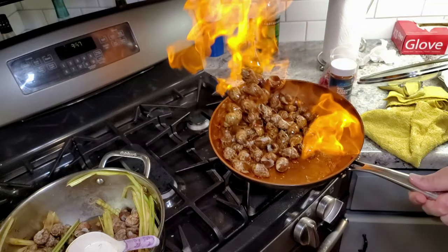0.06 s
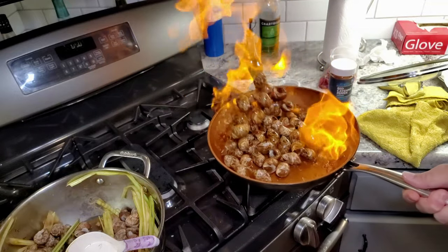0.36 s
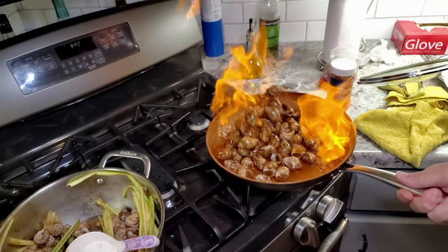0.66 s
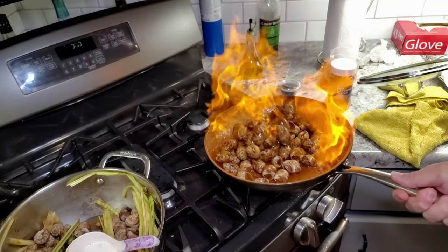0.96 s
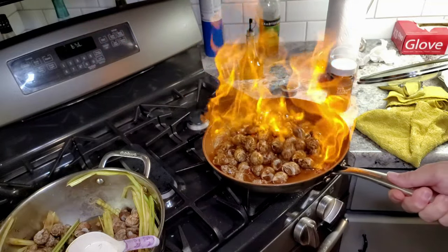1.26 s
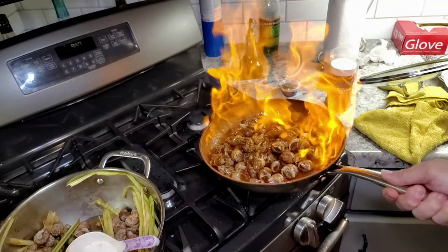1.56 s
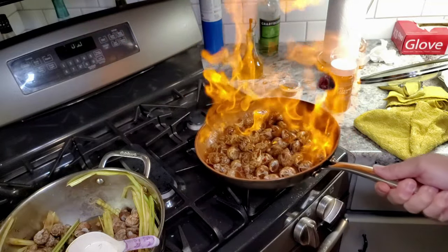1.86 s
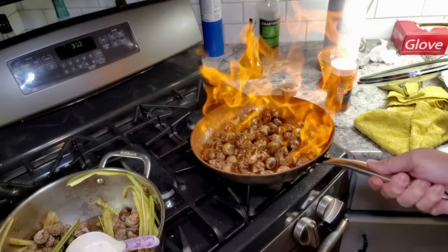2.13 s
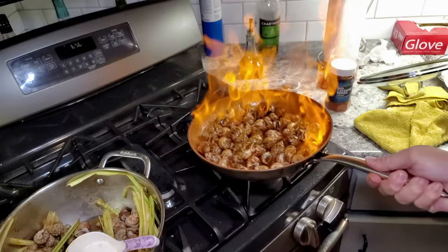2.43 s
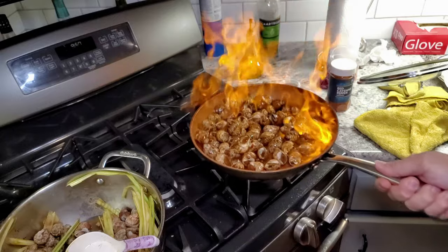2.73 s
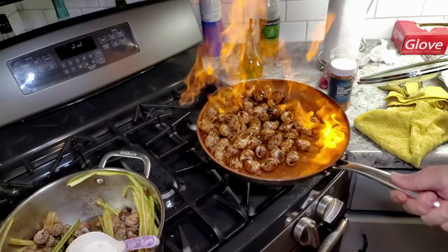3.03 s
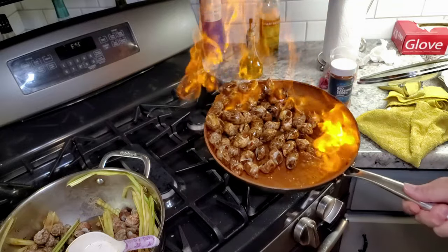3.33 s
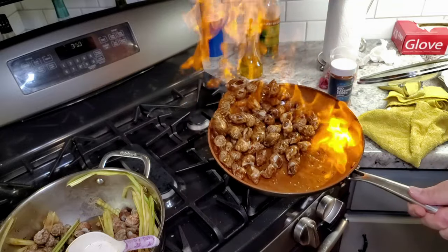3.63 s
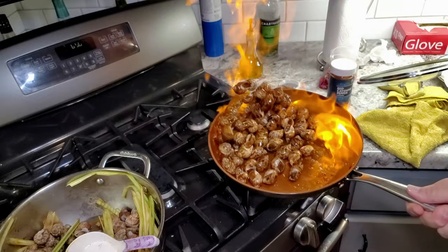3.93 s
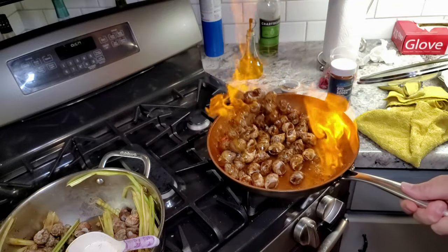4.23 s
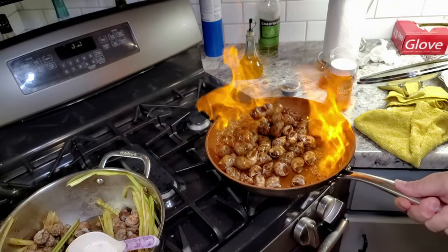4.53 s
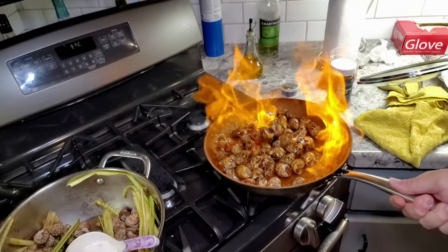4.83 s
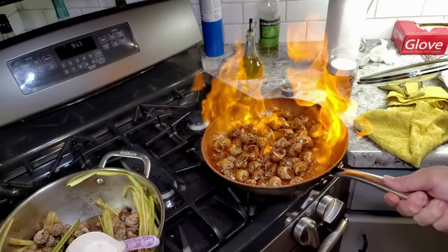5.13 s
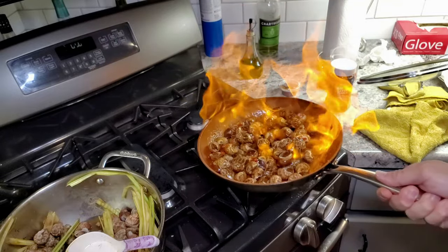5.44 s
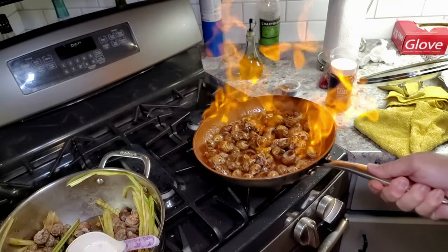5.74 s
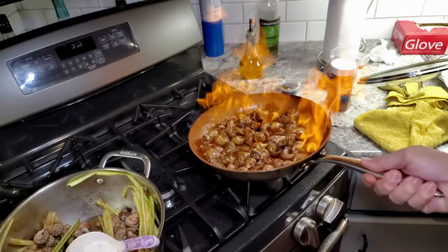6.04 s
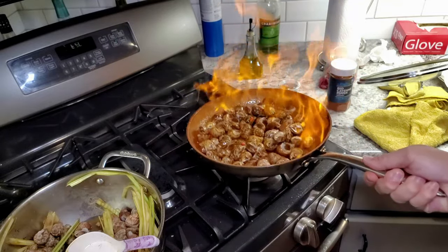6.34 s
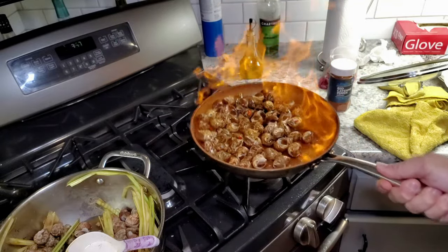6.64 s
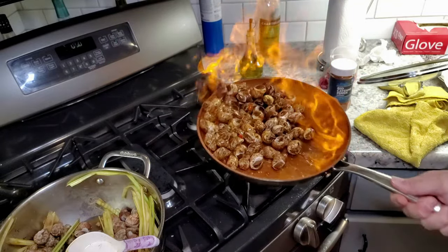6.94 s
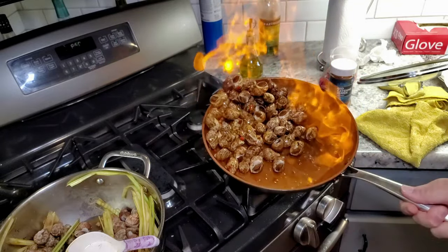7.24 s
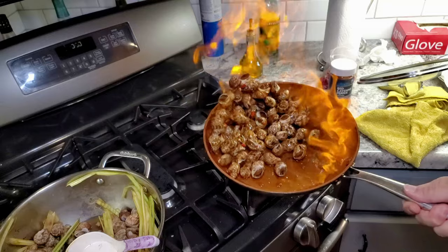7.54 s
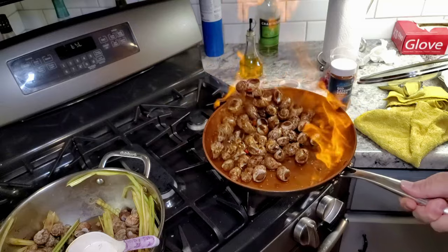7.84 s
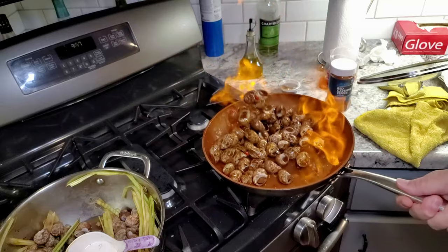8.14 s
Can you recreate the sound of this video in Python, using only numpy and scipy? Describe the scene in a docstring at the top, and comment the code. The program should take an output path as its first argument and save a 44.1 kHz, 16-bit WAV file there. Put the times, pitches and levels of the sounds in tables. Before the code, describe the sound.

Snail shells are tossed in a flaming frying pan, heard close and slowed down, so everything sounds deep and dull. A rolling rattle and a low flame rumble swell and sink together throughout, over a faint, muffled sizzle of boiling liquor. Hollow knocks start at once and thicken from 0.5 to 2.4 seconds, with deep thuds, small shell clinks and harder crashes near 0.9 and 1.7 seconds. A few lighter knocks come around 2.8 seconds, then a lull lasts until about 4.1. The shells tumble down again, loudest from 4.7 to 5.2 seconds, with heavy knocks, thuds and clinks, the hardest hits briefly overloading the microphone. The heap settles into scattered knocks, growing quiet around 7 seconds. From about 7.6 seconds the knocks build again, with several firm landings up to the end just after 8 seconds.

```python
"""Flaming snail shells in slow motion

Snail shells are tossed in a frying pan; slowed down, everything is deep and dull. They land with
hollow knocks and deep thuds and clink against each other over the rolling rattle of the heap.
Flames rumble, boiling liquor sizzles, and the hardest crashes overload the microphone."""
import sys
import numpy as np
from scipy import signal
from scipy.fft import rfft, irfft
from scipy.io import wavfile

SR = 44100
rng = np.random.default_rng(int(sys.argv[2]) if len(sys.argv) > 2 else 0)


def int16_out(signal):
    """Quantize to a 16-bit WAV file."""
    q = np.round(np.clip(np.atleast_2d(signal).T, -1, 1) * 32767)
    wavfile.write(sys.argv[1], SR, q.astype(np.int16))


N = 361179
RING_SAMPLES = 2 ** 15
FREQS_HZ = np.fft.rfftfreq(RING_SAMPLES, 1 / SR)


def gain_of(db):
    """Decibels to amplitude."""
    return 10 ** (np.asarray(db) / 20)


def unit_rms(x):
    """Scales to rms 1."""
    return x / np.sqrt(np.mean(x ** 2) + 1e-20)


def envelope(curve):
    """Gain per sample from (seconds, dB) points."""
    return gain_of(np.interp(np.arange(N) / SR, *np.transpose(curve)))


def add(mix, start_s, sound):
    """Mixes a sound in at start_s."""
    part = mix[max(round(start_s * SR), 0):][:len(sound)]
    part += sound[:len(part)]


def coloured(x, spectrum):
    """Filters by a spectrum of (Hz, dB) points."""
    hz, db = np.transpose(spectrum)
    curve_db = np.interp(np.log(FREQS_HZ + 1), np.log(hz + 1), db)
    taps = np.fft.fftshift(irfft(gain_of(curve_db)))
    return signal.fftconvolve(x, taps)[len(taps) // 2:][:len(x)]


def mode_responses(modes):
    """One frequency response per mode; a soft contact rounds off its upper skirt."""
    rows = []
    for hz, width_hz, db in modes:
        damping = 1j * FREQS_HZ * width_hz
        resonance = damping / (hz ** 2 - FREQS_HZ ** 2 + damping)
        rows.append(gain_of(db) * resonance / (1 + 1j * FREQS_HZ / hz) ** 2)
    return np.array(rows)


def contact_band(hz, octaves, floor_db):
    """The band a contact excites: a bell on the octave scale."""
    return np.exp(-.5 * (np.log2((FREQS_HZ + 1) / hz) / octaves) ** 2) + gain_of(floor_db)


def random_spot(body):
    """Each spot on a body drives its modes with different weights."""
    weights = rng.choice([-1, 1], len(body)) * rng.uniform(.5, 1.5, len(body))
    return weights @ body


def ringing(drive, body, band):
    """A driven body rings, mainly in the contact band, and fades to silence."""
    fade = (1 - np.linspace(0, 1, len(drive)) ** 2) ** 2
    return irfft(rfft(drive) * random_spot(body) * band) * fade


def ticks(per_s, spread_db, samples):
    """Random impulses, mostly small, a few large."""
    sizes = gain_of(spread_db * np.minimum(rng.exponential(1, samples), 4))
    return sizes * rng.choice([-1, 1], samples) * (rng.random(samples) < per_s / SR)


def blow(t, hz, rise_cycles):
    """The push of a contact swells and dies within a few cycles."""
    age = t * hz / rise_cycles
    return age * np.exp(1 - age) * np.sin(2 * np.pi * hz * t + rng.uniform(0, 2 * np.pi))


# Modes of the loaded pan. Each row: frequency in Hz, width in Hz, level in dB.
PAN_MODES = [(91.5, 23, -9), (106, 6.5, -7.5), (153.7, 29, 0.5), (169, 40, -5), (225.2, 22, 5),
             (245.4, 29, 1), (282, 21, 1), (351.7, 11, -0.5), (418.3, 18, 0.5), (487.1, 20, 0.5),
             (539, 33, -2), (601, 14, 0), (621.1, 21, 0.5), (678.8, 13, -2), (736, 39, -9),
             (810.7, 40, -7.5), (823, 44, -4.5), (872.4, 13, -4.5), (968.6, 8.4, -6.5), (979, 39, -17),
             (1134, 38, -14), (1171, 88, -20.5), (1480, 120, -22), (1830, 820, -29)]
# Heap motion: quiet in flight, loudest coming down, then rolling to rest.
# Each row: time in seconds, level in dB.
HEAP_MOTION = [(0.0, -22), (0.46, -30), (0.86, -18.5), (1.8, -22), (2.62, -29), (2.94, -27), (3.44, -37.5),
               (4.04, -30), (4.33, -26.5), (4.97, -13.5), (5.36, -18), (5.66, -28), (6.61, -27),
               (7.46, -37.5), (7.82, -29), (8.19, -25)]


def rattle(spots=6):
    """The rolling heap makes many small bumps on different spots of the pan."""
    pan = mode_responses(PAN_MODES)
    bumps = np.zeros(N)
    for _ in range(spots):
        impacts = ticks(per_s=60, spread_db=1.84, samples=N)
        bumps += signal.oaconvolve(impacts, irfft(random_spot(pan)))[:N]
    return envelope(HEAP_MOTION) * unit_rms(bumps)


# Spectrum of the flames and thuds. Each row: frequency in Hz, level in dB.
RUMBLE_SPECTRUM = [(5, -18.5), (12, -9), (22, -15), (55, -15.5), (66, -18), (80, 4.5), (110, 1),
                   (128, -12.5), (145, -4), (180, -10.5), (235, -4.5), (330, -13), (1200, -45)]
# Deep thuds as the heap lands. Each row: start in seconds, relative peak in dB.
LANDING_THUDS = [(0.542, -27), (0.773, -14), (1.148, -15), (1.222, -12), (3.117, -25.5), (4.209, -17.5),
                 (4.47, -14.5), (4.889, -14), (5.064, -9.5), (6.271, -26.5), (7.128, -20.5), (7.66, -24)]


def flames_and_thuds(flame_db=-16, fanning_power=0.71, thud_db=-5, swell_s=0.02):
    """Turbulent flames rumble, fanned by the heap; its landings thud, swelling quickly and dying."""
    puffs = ticks(per_s=900, spread_db=2.5, samples=N)
    level = gain_of(flame_db) * envelope(HEAP_MOTION) ** fanning_power
    age = np.arange(SR) / SR / swell_s
    for start_s, db in LANDING_THUDS:
        add(level, start_s, gain_of(db + thud_db) * age * np.exp(1 - age))
    return level * unit_rms(coloured(puffs, RUMBLE_SPECTRUM))


# Strength of the boil. Each row: time in seconds, relative level in dB.
SIZZLE_LEVELS = [(0.0, -40), (1.66, -41), (2.03, -42.5), (4.45, -40), (4.79, -47), (5.98, -45), (8.19, -44)]
# Bubble spectrum. Each row: frequency in Hz, level in dB.
SIZZLE_SPECTRUM = [(200, -14), (900, -3.5), (1040, -9.5), (1160, -1.5), (1280, -2.5), (1480, 3),
                   (1950, 3.5), (2060, -0.5), (2200, 2.5), (2320, -5), (2460, -3), (2700, -13)]


def sizzle(level_db=1):
    """Liquor boils on hot metal; countless small bubbles merge into an even hiss."""
    pops = ticks(per_s=5000, spread_db=1.0, samples=N)
    return gain_of(level_db) * envelope(SIZZLE_LEVELS) * unit_rms(coloured(pops, SIZZLE_SPECTRUM))


# Shells landing. Each row: start in seconds, relative blow level in dB, pitch in Hz, clatter in dB.
LANDINGS = [(0.0462, -7, 336, -25), (0.0859, 1, 260, -18.5), (0.2042, -13, 320, -22.5),
            (0.488, -3.5, 425, -15.5), (0.546, -13, 297, -22), (0.6315, -5, 305, -42.5),
            (0.7156, -6.5, 294, -29), (0.7695, 3, 380, -20), (0.816, -7, 332, -14.5),
            (0.8759, -2, 486, -12), (0.887, 3.5, 304, -9), (0.930, -6, 478, -15), (1.0254, 0.5, 294, -23.5),
            (1.156, -5.5, 200, -19), (1.2554, -3.5, 420, -23.5), (1.459, -2.5, 260, -17),
            (1.4796, -6, 309, -16), (1.5383, 0, 317, -24.5), (1.675, 2.5, 480, -6.5),
            (1.8273, -13, 443, -17.5), (1.919, -4, 277, -28), (1.969, -2, 360, -16.5),
            (2.1856, -6.5, 302, -22), (2.2398, -1, 320, -27), (2.2832, -8.5, 340, -25),
            (2.3557, -5.5, 430, -26.5), (2.789, -7.5, 608, -24), (2.821, -7, 580, -17),
            (2.855, -15.5, 634, -24), (2.8882, -4.5, 590, -22.5), (3.0881, -22, 328, -25.5),
            (3.426, -10, 533, -31), (4.1696, 1, 265, -21.5), (4.235, -1.5, 507, -13), (4.2641, 3, 438, -22),
            (4.3947, -13.5, 300, -19.5), (4.4801, -3, 195, -26), (4.549, -3, 400, -18.5),
            (4.6132, 0, 505, -27.5), (4.7039, 10, 499, -13), (4.7872, -3.5, 411, -17),
            (4.809, -4.5, 305, -20.5), (4.901, 8.5, 457, -8), (5.088, 5.5, 287, -8.5),
            (5.1182, 2.5, 268, -21), (5.257, -11.5, 310, -23), (5.3896, -13, 317, -19.5),
            (5.4986, -11, 462, -19.5), (5.879, 0.5, 354, -19.5), (6.0662, -3, 370, -32.5),
            (6.1942, -6, 548, -25.5), (6.278, 0.5, 415, -19), (6.4569, -9.5, 311, -25.5),
            (6.6163, -4, 416, -33), (6.7539, -11.5, 385, -26.5), (6.883, -24, 386, -23.5),
            (7.1391, -19, 208, -25), (7.4639, -11, 260, -34), (7.5851, -10, 370, -28.5),
            (7.6032, -5.5, 490, -19.5), (7.6719, -21, 407, -18.5), (7.801, -8, 390, -25),
            (7.8441, 4, 354, -14), (7.9662, 4, 330, -19.5), (8.0903, -2.5, 430, -18.5),
            (8.165, 2.5, 235, -18)]


def knocks(blow_db=-5, rise_cycles=0.51, rebound_s=0.008, rebound_db=-6,
           settle_s=0.053, linger_db=-13, linger_s=0.11,
           crash_db=-7.5, crash_gap_s=0.008, crash_step_db=-1.5):
    """A shell thumps the pan and rebounds; the pan rings on as its neighbours chatter and settle."""
    out, t = np.zeros(N), np.arange(RING_SAMPLES) / SR
    pan = mode_responses(PAN_MODES)
    settling = np.exp(-t / settle_s) + gain_of(linger_db) * np.exp(-t / linger_s)
    early = (t > .011) & (t < .04)
    lowpass = signal.butter(3, 1100, fs=SR, output="sos")
    for start_s, db, hz, clatter_db in LANDINGS:
        chatter = ticks(per_s=600, spread_db=1.5, samples=len(t)) * settling
        chatter[0] = 4  # the blow itself starts the modes
        clatter = ringing(chatter, pan, contact_band(hz * 1.33, octaves=0.83, floor_db=-4.5))
        clatter *= gain_of(clatter_db) / (clatter[early].std() + 1e-12)
        push = blow(t, hz, rise_cycles)
        delay_s = rebound_s * rng.uniform(.7, 1.5)
        add(push, delay_s, gain_of(rebound_db) * blow(t, hz * rng.uniform(.8, 1.4), rise_cycles))
        # Three more shells follow, faint unless the clatter nears crash_db.
        crash = gain_of(2 * min(clatter_db - crash_db, 0))
        for k in range(3):
            delay_s = crash_gap_s * (k + rng.uniform(0.56, 1))
            add(push, delay_s, crash * gain_of(k * crash_step_db) * blow(t, hz, rise_cycles))
        thump = gain_of(db + blow_db) * signal.sosfilt(lowpass, push)
        add(out, start_s - .001, thump + clatter)
    return out


def stray_shells(per_s=7, over_heap_db=5.5, spread_db=2, middle_hz=310, octaves=0.34):
    """Single shells tumble off at random, as hard as the heap is moving."""
    out, t = np.zeros(N), np.arange(2 ** 11) / SR
    heap = envelope(HEAP_MOTION)
    for when, size, pitch in rng.random((round(per_s * N / SR), 3)):
        start = int(when * N)
        strength = heap[start] * gain_of(over_heap_db + spread_db * size)
        hz = middle_hz * 2 ** (octaves * (2 * pitch - 1))
        add(out, start / SR, strength * blow(t, hz, rise_cycles=0.56))
    return out


# Modes of a shell. Each row: frequency in Hz, width in Hz, level in dB.
SHELL_MODES = [(1320, 70, 2), (1463, 41, 10.5), (1630, 48, -2.5), (1880, 150, 5.5), (1900, 150, -2.5),
               (2150, 42, 2), (2417, 49, -4.5)]
# Shell against shell. Each row: start in seconds, relative level in dB, pitch in Hz.
SHELL_HITS = [(0.5164, -17, 1483), (.718, -25, 2240), (.7716, -17.5, 1535), (0.8133, -19, 2457),
              (1.021, -14.5, 1480), (1.026, -14, 2467), (1.0727, -15.5, 1800), (1.078, -16.5, 2395),
              (1.255, -10.5, 1695), (1.4067, -15.5, 2093), (1.444, -17, 1806), (1.4726, -21, 1503),
              (1.675, -15.5, 1640), (1.8108, -17.5, 1540), (3.4258, -18.5, 1806), (4.1698, -21, 1320),
              (4.2375, -20.5, 1514), (4.4376, -15.5, 1950), (4.571, -19.5, 1690), (4.615, -14, 1620),
              (4.704, -19.5, 1696), (4.8825, -12.5, 1950), (4.904, -6, 1630), (5.091, -17.5, 1395),
              (5.3215, -27, 2140), (5.547, -18, 1960), (5.873, -24, 2370), (8.046, -21.5, 1610)]


def clinks(level_db=-1.5, bounce_s=0.0036, linger_db=-22, linger_s=0.096, note_db=-7, note_s=0.0064):
    """Two shells touch in a burst of tiny contacts; one note rings out over the other modes."""
    out, t = np.zeros(N), np.arange(RING_SAMPLES) / SR
    shell = mode_responses(SHELL_MODES)
    contact = np.exp(-t / bounce_s) + gain_of(linger_db) * np.exp(-t / linger_s)
    note_shape = np.exp(-t / note_s) * (1 - np.exp(-t / bounce_s))
    for start_s, db, hz in SHELL_HITS:
        burst = rng.standard_normal(len(t)) * contact
        ring = ringing(burst, shell, contact_band(hz, octaves=0.21, floor_db=-9.5))
        note = gain_of(note_db) * note_shape / note_shape.max() * np.sin(2 * np.pi * hz * t)
        add(out, start_s - .001, gain_of(db + level_db) * (ring / abs(ring).max() + note))
    return out


def scene(low_cut_hz=68):
    """One close microphone; a low cut takes the deepest bass out of the knocks and rattle."""
    highpass = signal.butter(5, low_cut_hz, "high", fs=SR, output="sos")
    pan = signal.sosfilt(highpass, knocks() + stray_shells() + rattle())
    return (pan + clinks() + flames_and_thuds() + sizzle())[None]


# Treble lost in slow motion. Each row: frequency in Hz, gain in dB.
SLOW_MOTION_EQ = [(0, 4.5), (2480, -1.5), (2600, -9), (2720, -21.5), (2850, -22.5), (3200, -46),
                  (4000, -63), (5000, -94.5)]
# Roll-off after the overload. Each row: frequency in Hz, gain in dB.
OVERLOAD_EQ = [(0, 0), (4200, 0), (5800, -2.5), (6600, -9.5), (15000, -11.5)]
# Noise floor. Each row: frequency in Hz, level in dB.
HISS_SPECTRUM = [(0, -8.5), (4000, 0), (5800, -2.5), (7000, -19.5), (15000, -19.5)]


def record(dry, hiss_db=-90, knee_order=48, cutoff_hz=15800):
    """Slowed sound is dull; only peaks flattened at full scale and a faint hiss reach the treble."""
    slowed = coloured(dry[0], SLOW_MOTION_EQ)
    flattened = slowed / (1 + abs(slowed) ** knee_order) ** (1 / knee_order)
    hiss = gain_of(hiss_db) * unit_rms(coloured(rng.standard_normal(N), HISS_SPECTRUM))
    mix = coloured(flattened, OVERLOAD_EQ) + hiss
    lowpass = signal.firwin(511, cutoff_hz, window=("kaiser", 9), fs=SR)
    return signal.oaconvolve(mix, lowpass, "same")[None]


dry = scene()
out = record(dry)
int16_out(out)
```